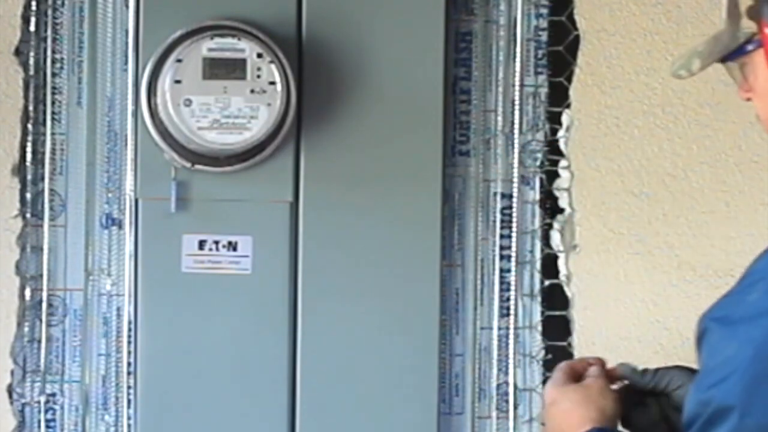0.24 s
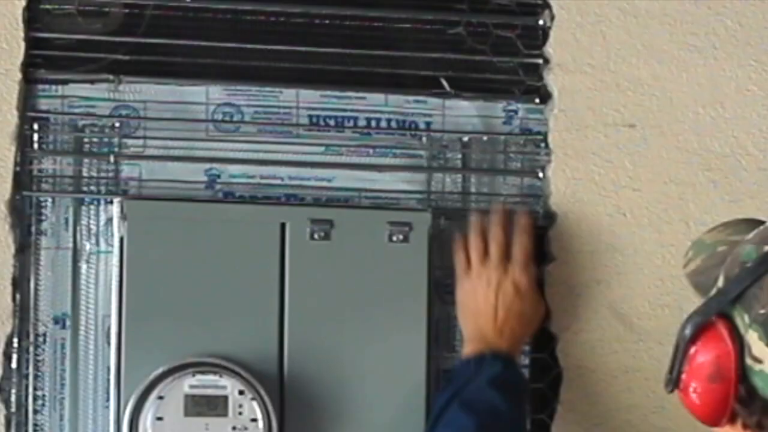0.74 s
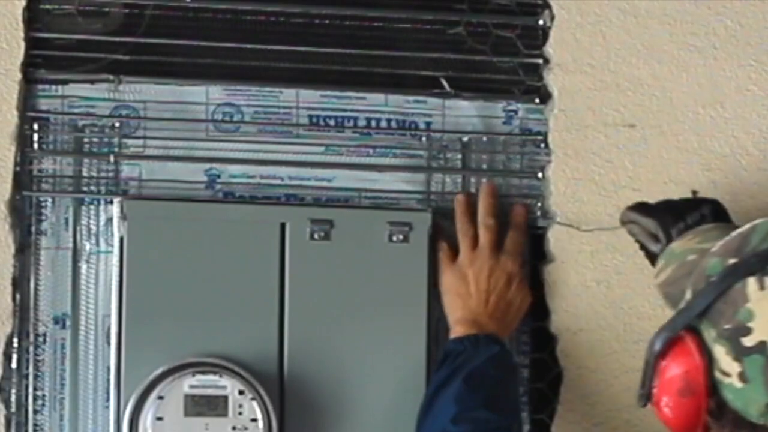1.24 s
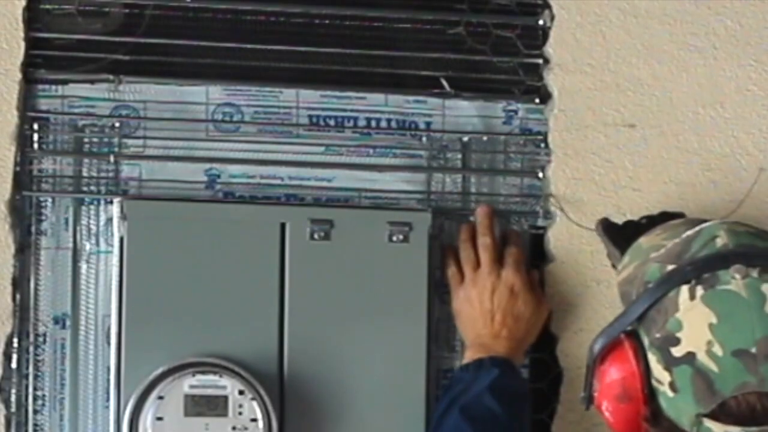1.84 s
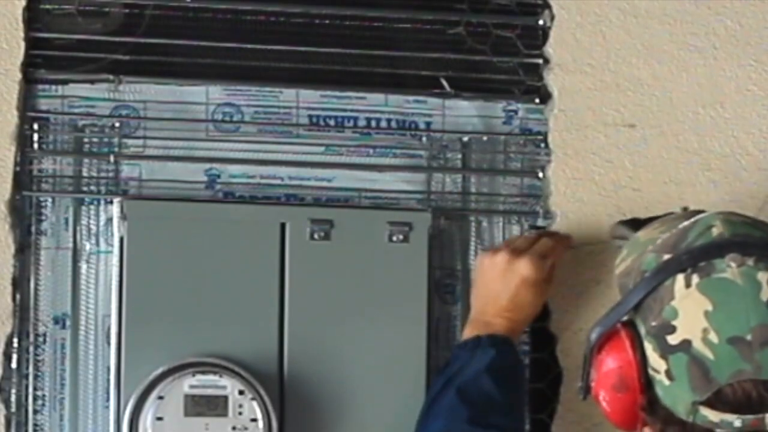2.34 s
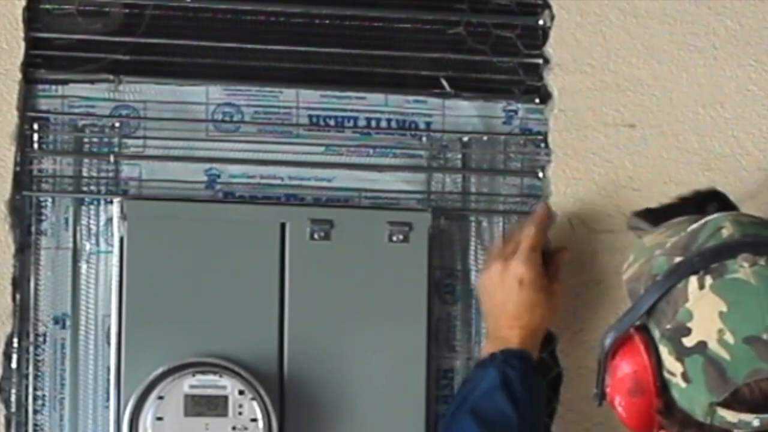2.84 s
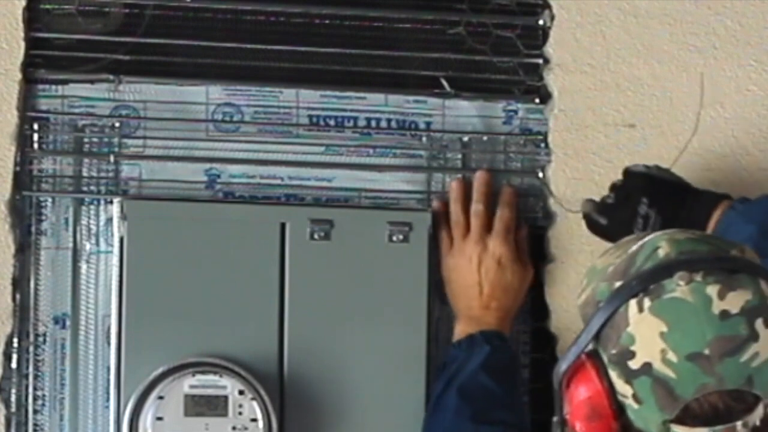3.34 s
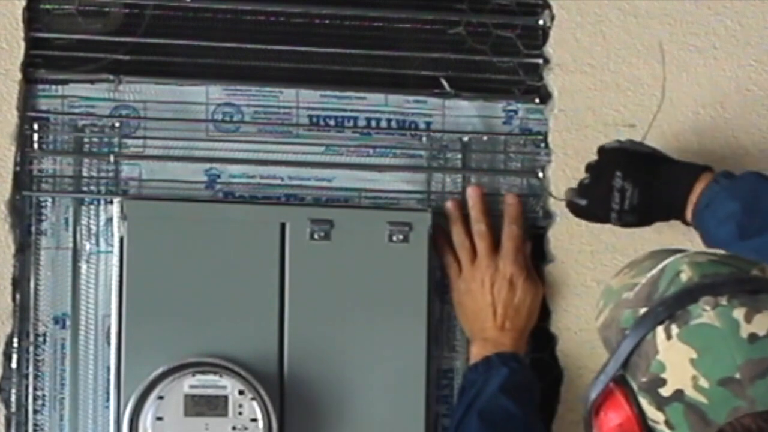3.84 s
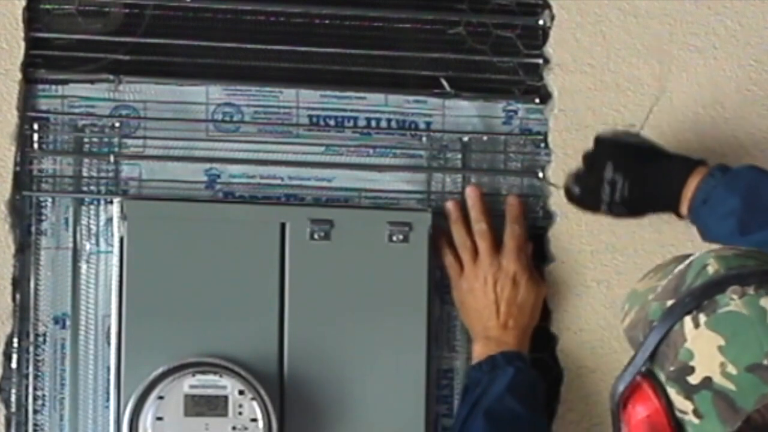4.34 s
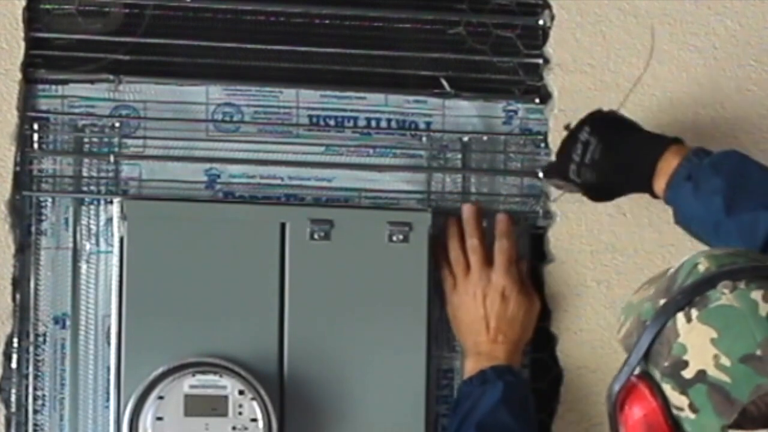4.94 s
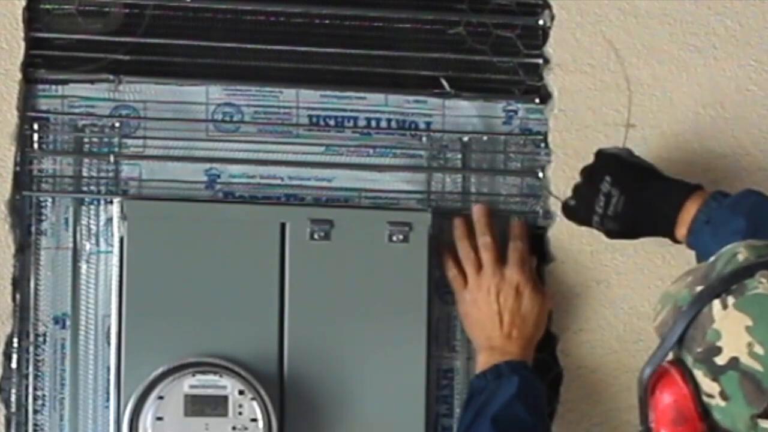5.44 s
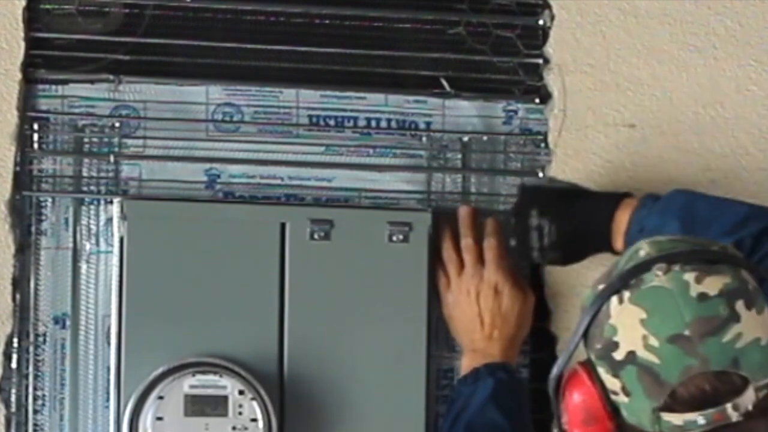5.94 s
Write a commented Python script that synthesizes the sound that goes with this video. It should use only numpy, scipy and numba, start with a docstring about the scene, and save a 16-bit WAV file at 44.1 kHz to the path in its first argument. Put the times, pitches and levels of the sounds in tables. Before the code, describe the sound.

Irregular snaps, scratches and small rattles of tie wire being threaded and twisted through metal mesh on an outside wall.

```python
"""Tie wire snaps and scrapes through metal lath as a gloved hand threads and twists it on an outside wall.
Impacts and sliding friction excite the resonances of wire, mesh, paper and boards, while a palm presses
the sheet. The free span pings, the cut end ticks, and near the end the wire gives one stick-slip squeak.
Behind it are puffs of wind, an insect-like hiss, distant site hum and the microphone's own hiss."""
import sys
import numpy as np
from scipy import signal
from scipy.fft import rfft, irfft
from scipy.io import wavfile
from scipy.ndimage import uniform_filter1d
from numba import njit

SR = 44100
rng = np.random.default_rng(int(sys.argv[2]) if len(sys.argv) > 2 else 0)


def dump(signal):
    """Clip the signal to [-1, 1] and save it as 16-bit WAV at the path in sys.argv[1]."""
    limited = np.clip(np.atleast_2d(signal).T, -1, 1)
    pcm = np.round(limited * 32767).astype(np.int16)
    wavfile.write(sys.argv[1], SR, pcm)


N = 272538

# wire snaps: (time [s], level [dB], weight into the wall [dB], tip sharpness [dB], nominal rattle T60 [s],
# rattle [dB], free-span pitch [Hz], ping [dB]); later dB columns are relative to the level
SNAP_EVENTS = [(0.0547, -30.5, -16.5, -21, 0.071, -16, 2600, -14),
               (0.0845, -33, -6, -19.5, 0.1, -2, 2230, -13), (0.1286, -45, -28, -25, 0.87, 1.5, 1980, -11),
               (0.1545, -43.5, -7, -21, 0.4, -17, 2030, -11),
               (0.3503, -30.5, -13.5, -31, 0.19, 1.8, 1690, 1), (0.3913, -47, -31, -24, 0.16, -12, 2970, 7),
               (0.4561, -54.5, -11, -11, 0.26, -1, 2270, -7), (0.5035, -45.5, -21, -28, 0.4, -6, 2520, -4),
               (0.7399, -41.5, -6, -28, 0.05, 11, 1870, -9), (0.7432, -22, -14, -28.5, 0.22, -4, 1880, 3.8),
               (0.7657, -38, -7.5, -17, 0.37, 3, 1970, -7), (0.7876, -35, -26, -18, 0.6, -9, 2100, -0.3),
               (0.817, -42.5, -8, -29, 0.61, -13, 2500, 3), (0.9492, -47.5, -3, -30, 0.28, -2, 2540, 4),
               (1.1732, -45, -12.5, -31, 0.19, -7, 2640, -2),
               (1.2352, -44.5, -38, -18, 0.16, -8, 2350, 0.5), (1.516, -39, -23, -29, 0.3, -6, 2430, -1.5),
               (1.6394, -33.5, -19, -37, 0.31, -6.5, 2500, -8),
               (1.6787, -50.5, -22, -18, 0.45, -8, 2470, 1.5),
               (1.9021, -52.5, -10, -17, 0.11, -13, 3520, 1), (2.0707, -36.5, -22, -35, 0.27, -2, 2390, -1),
               (2.0992, -38.5, -8.5, -20, 0.27, -3, 2080, 5.5),
               (2.2378, -45, -29, -21, 0.15, -8, 2500, -12), (3.287, -48, -14, -30, 0.15, -12, 2010, -9),
               (3.5274, -46, -26, -26, 0.2, -1, 2330, -4), (3.9036, -42, -9, -20, 0.22, 1.5, 2380, -4),
               (4.036, -48.5, -21, -10.5, 0.31, 6.5, 2250, -17),
               (4.394, -33.5, -5, -25, 0.48, -4, 2200, -3),
               (4.4037, -34.5, -15, -24.5, 0.32, -1, 1830, 3.5),
               (4.4645, -40.5, -21, -19, 0.21, -11, 3140, -7),
               (4.4959, -33, -22, -22, 0.36, -12, 2450, -14),
               (4.586, -15, -53, -13.5, 0.45, -10.5, 3220, -6), (4.851, -54, 1, -25, 0.21, -8.5, 1750, 6),
               (4.9357, -46, -6, -33, 0.21, 3, 2460, -7),
               (4.9548, -24.5, -17.5, -14.5, 0.22, -7.5, 2480, 5),
               (5.028, -30, -26, -24, 0.11, -16, 2550, -0.5), (5.2179, -22, -20.5, -30, 0.34, -5, 2820, -9),
               (5.5362, -39, -15.5, -35, 0.17, 1, 1880, -7), (5.584, -43, -35, -19, 0.22, 3, 2690, -4),
               (5.6007, -32, -31, -23, 0.19, -7, 2730, -12),
               (5.6434, -29.5, -24, -16, 0.17, -16, 2400, -13),
               (5.687, -25.5, -34, -12, 0.24, -7, 2380, -12), (5.6948, -30, -14, -17, 0.22, -13, 2260, -5),
               (5.7612, -36, -14, -19, 0.17, -6, 1970, 0), (5.8337, -29, -13.5, -32, 0.2, -6, 2280, -14),
               (5.9182, -44.5, -9, -17, 0.43, -8, 2820, -3), (5.9934, -46, -7, -23, 0.26, 1, 3000, -11),
               (6.065, -29.5, -24, -16, 0.29, -10, 2900, 2), (6.1294, -31, -17, -17, 0.22, -5.5, 2920, 2)]


def undb(db):
    return 10 ** (np.asarray(db) / 20)


def unit(x):
    return x / np.sqrt(np.mean(x ** 2))


@njit
def state_variable(x, g, k):
    """Two-integrator resonator with tuning g and damping k per sample; gain 1 at resonance."""
    y, band, low = np.empty(len(x)), 0., 0.
    for i in range(len(x)):
        v = (band + g[i] * (x[i] - low)) / (1 + g[i] * (g[i] + k[i]))
        band = 2 * v - band
        low += 2 * g[i] * v
        y[i] = k[i] * v
    return y


def resonate(x, hz, *widths_hz):
    """Damped resonators in series, one per bandwidth."""
    one = np.ones(len(x))
    for width in widths_hz:
        x = state_variable(x, np.tan(np.pi * hz / SR) * one, width / hz * one)
    return x


def coloured(spectrum):
    """Spectrally shaped Gaussian noise, rms 1."""
    hz, db = np.transpose(spectrum)
    f = np.maximum(np.fft.rfftfreq(N, 1 / SR), 1)
    gain = undb(np.interp(np.log(f), np.log(hz), db))
    return unit(irfft(rfft(rng.standard_normal(N)) * gain, N))


def walk(rate_hz):
    """Random modulation: held values, smoothed twice."""
    k = int(SR / rate_hz)
    steps = np.repeat(rng.standard_normal(N // k + 1), k)
    return 2.05 * uniform_filter1d(uniform_filter1d(steps, k), k)[:N]


def stroke(s, swell_s, hold_s, fade_s):
    """Exponential envelope in dB: up 20 in swell_s, level from s for hold_s, down 20 in fade_s."""
    t = np.arange(N) / SR - s
    return -20 * np.maximum(np.maximum(-t / max(swell_s, .002), (t - hold_s) / max(fade_s, .002)), 0)


def wind():
    """Turbulence at the microphone: low puffs over a faint breeze."""
    # (time [s], level [dB], swell [s], hold [s], fade [s])
    gusts = [(0.0, -73, 0.12, 0.02, 0.6), (0.974, -71, 0.36, 0.39, 0.12), (1.58, -75, 0.17, 0.02, 0.3),
             (1.887, -70.5, 0.2, 0.02, 0.66), (2.87, -71, 0.2, 0.05, 1.2), (4.465, -78, 0.47, 0.02, 0.18),
             (4.97, -70, 0.3, 0.02, 0.15), (5.87, -72, 0.4, 0.02, 0.29)]
    breeze = undb(-87.5)
    puffs = sum(undb(db + stroke(s, swell, hold, fade)) for s, db, swell, hold, fade in gusts)
    flutter = undb(1.55 * walk(9.1))
    rumble = coloured([(8, -9.5), (20, -3.5), (50, -6.5), (90, -20.5), (400, -53)])
    return (breeze + puffs) * flutter * rumble


def insects():
    """Narrow-band noise with slight amplitude modulation, like far-off insects."""
    hz, width_hz = 4027, 450
    band = resonate(rng.standard_normal(N), hz, width_hz, width_hz)
    return undb(-71.5 + 0.72 * walk(4.7)) * unit(band)


def site_hum():
    """Stationary broadband noise from the distant site."""
    # (frequency [Hz], spectral density [dB])
    hum_spectrum = [(35, -43), (60, -6), (176, -7.5), (222, -5), (480, -5.5), (682, -1.5), (1200, -6.5),
                    (1310, -8.5), (2410, -6.5), (3340, -8.5), (3940, -8.5), (5090, -16.5), (9350, -24),
                    (12400, -21.5), (16000, -25.5)]
    return undb(-61.5) * coloured(hum_spectrum)


def microphone_hiss():
    """Self-noise: the part the two microphone ports do not share."""
    # (frequency [Hz], spectral density [dB])
    hiss_spectrum = [(30, 12), (60, -3), (150, 4), (700, -5.5), (1500, -26), (2500, -27), (4000, -37),
                     (5000, -4.5), (16000, -1)]
    return undb(-75.5) * coloured(hiss_spectrum)


def press(blows, power):
    """Forced vibration: a palm drives hollow, paper and boards; quicker pushes knock the first two harder."""
    # (time [s], board level [dB], swell [s], fade [s], paper [dB re boards], hollow thump [dB re boards])
    pushes = [(0.034, -63.5, 0.053, 0.03, -6, -6), (0.084, -51.5, 0.018, 0.04, 0, -12),
              (0.23, -66, 0.04, 0.4, -5, -19), (0.47, -70, 0.05, 0.22, -15, -17),
              (0.684, -59.5, 0.13, 0.064, -6, -30), (0.97, -64, 0.096, 0.5, 2.5, -3.5),
              (1.3, -56.5, 0.053, 0.12, -1.5, -10), (1.45, -63.5, 0.07, 0.23, 2.5, -12),
              (1.648, -68, 0.084, 0.05, 2, -25), (1.73, -67, 0.07, 0.17, -3, 0),
              (2.3, -80, 0.07, 0.25, 7, -16), (3.478, -57.5, 0.095, 0.05, -10, -3.5),
              (3.704, -65.5, 0.15, 0.093, 4.5, 3.5), (3.956, -57, 0.17, 0.044, -4.5, -10),
              (4.14, -65.5, 0.07, 0.15, -4, 2), (4.253, -57.5, 0.22, 0.02, -8, -5.5),
              (4.394, -59.5, 0.014, 0.069, 2, 1.5), (4.493, -49, 0.013, 0.056, -12, -6),
              (4.636, -55.5, 0.038, 0.27, -7.5, -7), (4.726, -66.5, 0.099, 0.12, -5, 8.5),
              (4.89, -66.5, 0.057, 0.12, 11.5, 7), (4.958, -58, 0.011, 0.085, 6, 6),
              (5.154, -62.5, 0.17, 0.097, -12, -28), (5.37, -63.5, 0.22, 0.12, -2, -1.5),
              (5.481, -67, 0.12, 0.034, 4, 12), (5.689, -62.5, 0.012, 0.04, -2, 3.5),
              (5.721, -41.5, 0.03, 0.064, -9, -21), (5.837, -61, 0.016, 0.032, -1, 13),
              (5.923, -57.5, 0.028, 0.074, -17, -8.5), (6.116, -41.5, 0.052, 0.065, -9, -12)]
    knock_db, knock_swell_s, hold_s = 7, 0.011, 0.005
    for s, db, swell, fade, paper, thump in pushes:
        knock = undb(db + np.array([thump, paper]) + knock_db)
        blows[:2, int(s * SR)] += knock * knock_swell_s / max(swell, .002)
        push = undb(db + stroke(s, swell, hold_s, fade))
        power[:3] += (undb([thump, paper, 0])[:, None] * push) ** 2


def snap(blows, power):
    """Impulsive excitation: each snap strikes every mode group and leaves an exponentially dying rattle."""
    # per group: (base level [dB]), (share of weight [ratio]), (share of sharpness [ratio]), (crest [dB])
    base_db = [-33, -7.5, -1, -7, -12.5, -1, -5]
    by_weight = [0.79, 0.84, 0.95, 0.26, 0.1, 0.088, 0.061]
    by_sharpness = [0.017, 0.032, 0.04, 0.076, 0.079, 0.95, 1]
    crest_db = [12.6, 4.3, 1.5, 1.8, 8.6, 8.8, 12.6]
    t60_ratios = np.array([2.04, 0.54, 0.59, 0.82, 1.2, 0.63, 0.38])
    for s, db, weight, sharpness, t60, rattle, *_ in SNAP_EVENTS:
        i = int(s * SR)
        group_db = db + np.array(base_db) + weight * np.array(by_weight) + sharpness * np.array(by_sharpness)
        blows[:, i] += undb(group_db + crest_db)
        age = np.arange(min(N - i, SR // 3)) / SR
        decay_db = 60 * age / (max(t60, .01) * t60_ratios[:, None])
        power[:, i:i + len(age)] += undb((group_db + rattle)[:, None] - decay_db) ** 2


def scrape(power):
    """Sliding friction drives all groups but the hollow; returns the span's power and weighted pitch."""
    # (time [s], level [dB], swell [s], hold [s], fade [s], weight into the wall [dB re level],
    # tip [dB re level], sparkle [dB re level], span pitch [Hz])
    pulls = [(0.055, -46.5, 0.014, 0.005, 0.062, -2, -10, -19, 2600),
             (0.077, -55, 0.011, 0.066, 0.061, 6.5, -15, -21, 2630),
             (0.354, -52.5, 0.012, 0.04, 0.023, -4, -13, -17, 2590),
             (0.944, -61, 0.04, 0.01, 0.47, -3, -12.5, -21, 2520),
             (1.205, -61.5, 0.16, 0.074, 0.17, -4.5, -11, -19, 2550),
             (2.071, -51, 0.008, 0.027, 0.17, -6, -12.5, -19, 2350),
             (3.464, -62.5, 0.1, 0.015, 0.088, -1, -18, -23, 2540),
             (3.67, -63.5, 0.16, 0.01, 0.27, 0.3, -13, -23, 2420),
             (3.905, -52.5, 0.01, 0.01, 0.13, -7, -11.5, -15, 2550),
             (4.04, -61, 0.006, 0.0087, 0.11, 0, -5, -0.5, 2540),
             (4.471, -45, 0.03, 0.032, 0.076, -5.5, -18, -25, 2650),
             (4.95, -56.5, 0.25, 0.01, 0.02, 3.5, -12.5, -17, 2450),
             (4.955, -37.5, 0.0032, 0.0078, 0.068, -4.5, -15, -10, 2470),
             (5.025, -51.5, 0.035, 0.005, 0.23, -1.5, -15, -21, 2630),
             (5.388, -59.5, 0.1, 0.1, 0.054, 0, -13, -24, 2450),
             (5.6, -48, 0.02, 0.083, 0.058, -21, -2.5, -15, 2440),
             (5.691, -37.5, 0.1, 0.061, 0.13, -4.5, -9, -19.5, 2450),
             (5.834, -46.5, 0.006, 0.005, 0.088, -3.5, -32, -25, 2450),
             (6.0, -44, 0.016, 0.062, 0.05, -4.5, -30, -29, 2850),
             (6.042, -39.5, 0.035, 0.13, 0.05, -11.5, -11, -22.5, 2850)]
    # for paper, boards, mesh and wire: (base level [dB]), (share of weight [ratio])
    base_db = [-8, -2, -2, -1]
    by_weight = [0.62, 1, 0.53, 0]
    span_power, weighted_hz = np.full(N, 1e-18), np.full(N, 2500e-18)
    for s, db, swell, hold, fade, weight, tip, sparkle, hz in pulls:
        drag = undb(db + stroke(s, swell, hold, fade)) ** 2
        group_db = np.append(base_db + weight * np.array(by_weight), [tip, sparkle])
        power[1:] += undb(group_db)[:, None] ** 2 * drag
        span_power += drag
        weighted_hz += hz * drag
    return span_power, weighted_hz / span_power


def contacts(per_s, spread_db, most_db):
    """Shot noise of wire catching unevenly on mesh, rms 1."""
    size_db = np.minimum(spread_db * rng.exponential(size=N), most_db)
    return unit((rng.random(N) < per_s / SR) * undb(size_db) * np.sign(rng.standard_normal(N)))


def ring(rub, blow, modes):
    """Modal superposition with alternating signs; a rub keeps its rms, a blow its peak."""
    lo, hi = modes[0][0], modes[-1][0]
    skirt_hz = 2.5 * (hi - lo)

    def body(force):
        band = resonate(force, np.sqrt(lo * hi), skirt_hz, skirt_hz)
        return sum((-1) ** k * undb(db) * resonate(band, hz, w) for k, (hz, w, db) in enumerate(modes))

    response = body(signal.unit_impulse(8192))
    return body(rub / np.linalg.norm(response) + blow / np.abs(response).max() + 1e-18)


def lath():
    """Source and filter: palm, snaps and scrapes drive the same seven groups of modes."""
    # modes, from the wall's hollow to the highest sparkle: (frequency [Hz], bandwidth [Hz], gain [dB])
    hollow = [(104.4, 71, -9.5), (176, 25.5, 3), (259, 40, -3.5)]
    paper = [(301, 68, -8.5), (396.4, 36, 0.5), (425.5, 46, 2.5), (486, 104, 0.5)]
    boards = [(594, 48, 1.5), (697.5, 59, 2.5), (775, 35, 5.5), (935, 310, -2)]
    mesh = [(1250, 810, -2.5), (1753, 180, 4.5), (1875, 160, 4), (2208, 88, 7)]
    wire = [(2309, 33, 3), (2490, 111, 1.5), (2706, 69, 2), (2896, 206, 0), (3210, 710, -4), (3644, 69, -5),
            (3793, 66, -3.5), (4324, 980, -10.5)]
    tip = [(4810, 200, 5.5), (5160, 120, 6), (5370, 96, 6), (5746, 115, 5), (6250, 180, 1),
           (6660, 135, 2.5), (7240, 490, 0)]
    sparkle = [(7860, 1630, -2), (11030, 900, -0.5), (12800, 7100, -9)]
    groups = [hollow, paper, boards, mesh, wire, tip, sparkle]
    catch_shares = [0.14, 0.33, 0.24, 0.18, 0.33, 0.47, 0.13]
    blows, power = np.zeros((2, len(groups), N))
    press(blows, power)
    snap(blows, power)
    span_power, span_hz = scrape(power)
    catches = contacts(per_s=350., spread_db=2.0, most_db=8.0)
    grip = undb(1.09 * walk(60))

    def friction(drive, catch_share):
        """Catches common to all groups, plus independent smooth noise."""
        smooth = np.sqrt(1 - catch_share) * rng.standard_normal(N)
        return np.sqrt(drive) * grip * (np.sqrt(catch_share) * catches + smooth)

    span_width_hz = 550
    span = resonate(friction(span_power, 0.2), span_hz, span_width_hz)
    out = undb(-13.5) * span * np.sqrt(SR / np.pi / span_width_hz)
    for blow, drive, modes, catch_share in zip(blows, power, groups, catch_shares):
        out += ring(friction(drive, catch_share), blow, modes)
    return out


def pings():
    """Free vibration: at each snap the span cracks, rings and chatters at a pitch set by its length."""
    crack_width_hz, ring_width_hz = 1350, 350
    crack_db, chatter_db, t60_share = -5.5, -21, 0.4
    out, age = np.zeros(N + SR // 8), np.arange(SR // 8) / SR
    tap = signal.unit_impulse(len(age))
    for s, db, _, _, t60, _, hz, ping_db in SNAP_EVENTS:
        force = rng.standard_normal(len(age)) * undb(chatter_db - 60 * age / max(t60_share * t60, .01))
        force[0] = 1  # the blow ahead of the chatter
        crack = resonate(tap, hz, crack_width_hz, crack_width_hz, crack_width_hz)
        crack /= np.abs(crack).max()
        tone = resonate(force, hz, crack_width_hz, crack_width_hz, ring_width_hz)
        tone *= SR / (2 * np.pi * ring_width_hz)
        i = int(s * SR)
        out[i:i + len(age)] += undb(db + ping_db) * tone + undb(db + crack_db) * crack
    return out[:N]


def ticks():
    """Impulse response of a strand flicked by the wire's cut end: one short, high ring."""
    # (time [s], peak level [dB], pitch [Hz])
    flicks = [(2.2368, -59, 5070), (2.7202, -57, 6410), (3.6491, -52, 6000), (3.6865, -61, 4580),
              (3.7908, -48, 4580), (3.904, -47, 8200), (4.0372, -47, 5700), (5.217, -32, 5450),
              (5.5588, -58, 4510), (5.6274, -44, 5000), (5.7347, -28, 5230), (5.7583, -28, 4670),
              (6.0681, -33, 4760), (6.131, -25, 5750)]
    width_hz = 650
    out, tap = np.zeros(N + SR // 20), signal.unit_impulse(SR // 20)
    for s, db, hz in flicks:
        tone = resonate(tap, hz, 4 * width_hz, width_hz)
        i = int(s * SR)
        out[i:i + len(tap)] += undb(db) * tone / np.abs(tone).max()
    return out[:N]


def squeak():
    """Stick-slip oscillation of the wire: a brief, slightly falling tone with two overtones."""
    # (time [s], slip rate [Hz], level [dB])
    slip = [(5.982, 3130, -48), (5.995, 3070, -39.5), (6.035, 2920, -46)]
    # (harmonic [number], level [dB re fundamental])
    overtones = [(2, -22), (3, -37)]
    times, hz, levels = np.transpose(slip)
    t = np.arange(N) / SR
    waver = 1 + .015 * walk(600)
    phase = 2 * np.pi * np.cumsum(np.interp(t, times, hz) * waver) / SR
    tone = np.sin(phase) + sum(undb(db) * np.sin(k * phase) for k, db in overtones)
    gate = np.clip(np.minimum(t - times[0], times[-1] - t) / 0.005, 0, 1)
    return np.sqrt(2) * gate * undb(np.interp(t, times, levels)) * tone


def scene():
    """Superposition: the sources are in phase in both channels, the self-noise in antiphase."""
    mid = lath() + pings() + ticks() + squeak() + wind() + insects() + site_hum()
    side = microphone_hiss()
    return np.array([mid + side, mid - side])


def record(dry):
    """Band limiting: a steep low-pass removes the highest treble."""
    cutoff_hz = 15800
    return signal.sosfilt(signal.ellip(10, .2, 60, cutoff_hz, fs=SR, output="sos"), dry)


dry = scene()
out = record(dry)
dump(out)
```